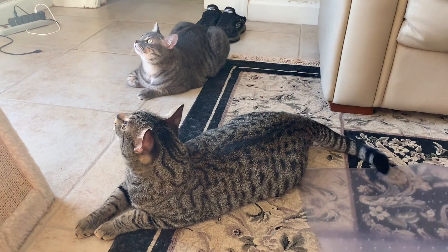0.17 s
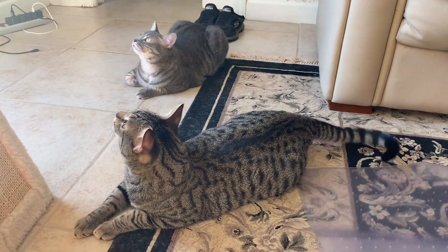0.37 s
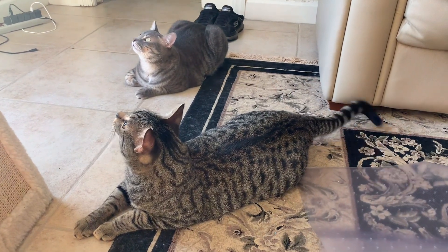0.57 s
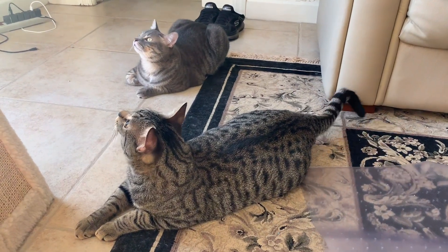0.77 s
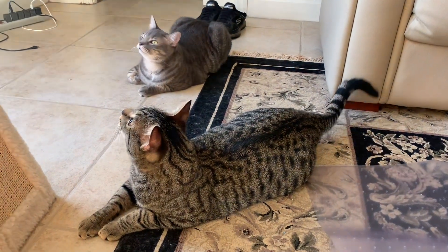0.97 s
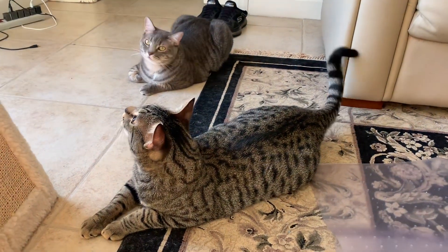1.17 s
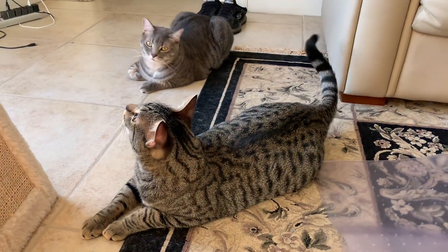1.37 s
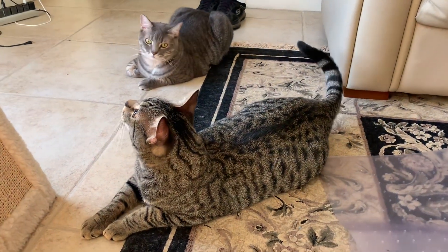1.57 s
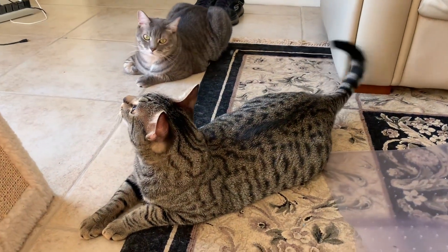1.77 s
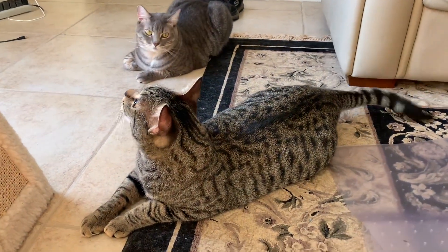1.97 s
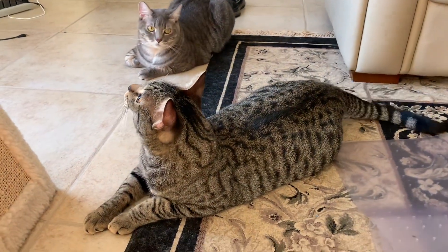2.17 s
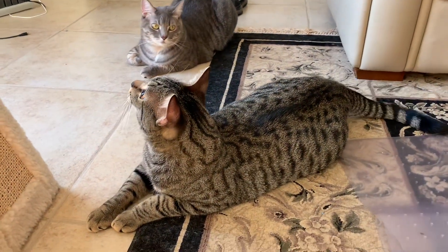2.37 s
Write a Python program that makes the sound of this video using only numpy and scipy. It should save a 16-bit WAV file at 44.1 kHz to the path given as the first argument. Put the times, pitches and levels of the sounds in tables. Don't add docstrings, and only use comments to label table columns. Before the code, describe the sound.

A cat gives two brief soft two-part chirps in a tiled living room over low ventilation rumble

```python
import sys
import numpy as np
from scipy import signal
from scipy.fft import rfft, irfft, next_fast_len
from scipy.io import wavfile
from scipy.ndimage import uniform_filter1d, map_coordinates

SR = 44100
rng = np.random.default_rng(int(sys.argv[2]) if len(sys.argv) > 2 else 0)


def level_to_linear(level):
    exponent = np.asarray(level, float) / 20
    return 10 ** exponent


def wav_out(sig):
    wavfile.write(sys.argv[1], SR, np.round(np.clip(np.atleast_2d(sig).T, -1, 1) * 32767).astype(np.int16))


N = 111132

# time in seconds, strength in dB.
FAN_STRENGTH = [(0.0, -47), (0.5, -48.5), (0.74, -49.5), (1.07, -47), (1.71, -48.5), (2.52, -45)]
# frequency in Hz, density in dB per Hz.
RUMBLE_SPECTRUM = [(28, -27.5), (40, -10.5), (62, -.5), (80, -5.5), (135, -5.5), (160, -13), (220, -13.5),
                   (500, -26.5)]
# frequency in Hz, width in Hz, height over the rumble in dB.
DUCT_RESONANCES = [(88.1, 13, 6.5), (412.5, 13.6, 9)]
# frequency in Hz, density in dB per Hz.
AIR_SPECTRUM = [(300, -17.5), (500, -3), (800, -2.5), (1100, -5), (1550, -2.5), (1900, -17), (2400, -22),
                (4000, -37)]
# frequency in Hz, left-right likeness from 0 to 1.
PORT_LIKENESS = [(60, 0.95), (300, .9), (800, 0.24), (1400, 0.58), (3000, 0.16), (7000, 0.14)]
# frequency in Hz, density in dB per Hz.
HISS_SPECTRUM = [(1500, -2), (2500, 2.5), (4000, 3.5), (7000, -1), (8500, 8.5), (10500, 1), (13000, 1.5),
                 (15500, -4)]
# frequency in Hz, phase in turns.
PORT_TURNS = [(0, 0), (1800, -.5), (3700, -1), (5300, -1.5), (6300, -2), (15700, 0)]
# frequency in Hz, phase taken back in turns.
NEAR_TURNS = [(0, 0), (950, .18), (1750, .44), (1950, .17), (2400, 0), (4300, 0), (5300, .22), (6300, 0)]
# time in seconds, pitch in Hz, level in dB, second harmonic in dB.
NOTES = [
    [(.123, 915, -62, -30), (.127, 925, -52, -30), (.138, 945, -50.5, -32), (.152, 964, -54, -28),
     (.194, 963, -54.5, -27), (.204, 963, -66, -20)],
    [(.224, 905, -60, -10), (.23, 888, -51, -5), (.242, 858, -52, 7), (.254, 866, -56, 4),
     (.262, 868, -59, -6), (.27, 868, -70, -8)],
    [(.991, 1012, -58, -22), (.995, 998, -48, -16), (1.004, 984, -48, -8), (1.02, 963, -49.5, -5),
     (1.03, 965, -56, -4), (1.062, 945, -60, -6), (1.072, 932, -70, -6)],
    [(1.095, 822, -64, -6), (1.102, 815, -54, -2), (1.112, 803, -53, -2), (1.122, 800, -59, -14),
     (1.134, 795, -69, -14)],
]
# third harmonic in dB, left-right difference in dB.
NOTE_MOUTHS = [(-38, 2.5), (-19, 2), (-38, 2), (-19, 1)]
# frequency in Hz, T60 in seconds.
ROOM_T60 = [(500, .4), (2000, .55), (3000, .5), (5000, .28), (10000, .2)]
# delay in seconds, level in dB.
WALLS = [(.0055, -4.5), (.0105, -10.5), (0.0145, -16), (0.0243, -14), (0.034, -16.5)]
# start in seconds, smack in dB, puff in dB, puff length in seconds,
# extra sag in dB per second.
PUFFS = [
    (.2046, -43, -63, .068, -55),
    (1.0535, -36, -54, .04, 35),
]
# frequency in Hz, width in Hz, level in dB.
PUFF_RESONANCES = [
    [(1740, 560, 2.5), (2550, 590, -2), (3420, 630, -10.5), (4350, 350, -7.5), (5070, 590, -5),
     (6060, 600, -17)],
    [(1520, 920, 13.5), (2050, 176, 25.5), (2600, 2050, 8.5), (4160, 200, -8), (4800, 1600, 4.5),
     (7100, 500, -7)],
]
# start in seconds, level in dB, left-right difference in dB.
TAPS = [
    (0.9184, -39, 3.6),
    (2.4363, -36.5, 12.6),
]
# frequency in Hz, level in dB, T60 in seconds.
TAP_MODES = [
    [(1220, -3.5, 0.027), (1470, 2.5, 0.015), (3020, -10, 0.015)],
    [(1070, -15, 0.025), (1337, -2, 0.022), (1990, -4.5, .014), (2560, -12, .008), (3020, -14, .012),
     (4250, -20.5, 0.0083)],
]
# start in seconds, level in dB, pitch in Hz.
TICKS = [(2.007, -29.5, 9740), (2.0087, -52, 9900), (2.437, -61, 9700), (2.4676, -48.5, 11230),
         (2.4676, -48, 12500), (2.4685, -52, 9800)]
# ratio to the pitch, level in dB, T60 in seconds.
TICK_MODES = [(.45, -19, 0.0022), (.62, -21, 0.0042), (.86, -12, 0.0065), (1.001, 6.5, .004),
              (1.079, 0, 0.0031), (1.24, -21, .003), (1.43, -21, 0.0038)]
# centre in seconds, length in seconds, level in dB.
BRUSHES = [
    (2.355, 0.12, -65.5),
    (2.485, 0.11, -63),
]
# frequency in Hz, density in dB per Hz.
RUG_SPECTRUM = [(450, -20), (650, -4), (780, -6.5), (950, -11), (1300, -36)]


def unit(x):
    return x / np.sqrt(np.mean(x ** 2) + 1e-20)


def along(points, hz):
    f, value = np.transpose(points)
    return np.interp(np.log(hz + 1), np.log(f + 1), value)


def wobble(rate_hz):
    knots = rng.standard_normal(int(N * rate_hz / SR) + 4)
    return map_coordinates(knots, [np.arange(N) * rate_hz / SR])


def filtered(x, response):
    m = next_fast_len(N + SR // 2)
    return irfft(rfft(x, m) * response(np.fft.rfftfreq(m, 1 / SR)), m)[..., :N]


def panned(x, left_over_right_db):
    return x * level_to_linear(np.array([[left_over_right_db / 2], [-left_over_right_db / 2]]))


def turned(x, turns):
    sides = np.array([[-1], [1]])
    return filtered(x, lambda hz: np.exp(1j * np.pi * np.interp(hz, *np.transpose(turns)) * sides))


def rush(gain, patchy_db):
    z = signal.stft(rng.standard_normal((2, N)), nperseg=512)[2]
    patches = uniform_filter1d(rng.standard_normal(z.shape[1:]), size=5, axis=0)
    patches = uniform_filter1d(patches, size=12, axis=1)
    pair = signal.istft(z * level_to_linear(patchy_db * unit(patches)), nperseg=512)[1][:, :N]

    def mid_side_gain(hz):
        angle = np.arccos(np.clip(along(PORT_LIKENESS, hz), -1, 1)) / 2
        return gain(hz) * [np.cos(angle), np.sin(angle)]

    mid, side = filtered(pair, mid_side_gain)
    return unit(np.array([mid + side, mid - side]))


def ventilation():
    s, db = np.transpose(FAN_STRENGTH)
    strength_db = np.interp(np.arange(N) / SR, s, db)

    def duct_gain(hz):
        peaks_db = sum(g / (1 + (2 * (hz - c) / w) ** 2) for c, w, g in DUCT_RESONANCES)
        return level_to_linear(along(RUMBLE_SPECTRUM, hz) + peaks_db - 90 * (hz > 520))

    def air_gain(hz):
        return level_to_linear(along(AIR_SPECTRUM, hz)) * (hz > 250) * (hz < 5000)

    rumble_db = 1 + strength_db + 0.37 * wobble(2.82)
    air_db = -61 + 0.7 * (strength_db - db.mean()) + 0.2 * wobble(3.11)
    rumble = level_to_linear(rumble_db) * rush(duct_gain, patchy_db=1.26)
    air = level_to_linear(air_db) * rush(air_gain, patchy_db=2.8)
    return rumble + panned(air, 1.8)


def voice():
    jitter, shimmer_db, edge_s = .003, .8, 0.0013
    t, out = np.arange(N) / SR, 0
    for rows, (third_db, pan_db) in zip(NOTES, NOTE_MOUTHS):
        s, hz, db, second_db = np.transpose(rows)
        pitch_hz = np.interp(t, s, hz) * (1 + jitter * wobble(147.8))
        phase = 2 * np.pi * np.cumsum(pitch_hz) / SR
        tone = np.sin(phase)
        tone = tone + level_to_linear(np.interp(t, s, second_db)) * np.sin(2 * phase)
        tone = tone + level_to_linear(third_db) * np.sin(3 * phase)
        edge = np.clip(np.minimum(t - s[0], s[-1] - t) / edge_s, 0, 1)
        level_db = np.interp(t, s, db) + shimmer_db * wobble(140)
        out = out + panned(np.sqrt(2) * tone * edge * level_to_linear(level_db), pan_db)
    return out


def room(x):
    wet_db = -8
    hz, t, z = signal.stft(rng.standard_normal((2, SR // 2)), SR, nperseg=256)
    decay = level_to_linear(-60 * t / along(ROOM_T60, hz)[:, None])
    tail = signal.istft(z * decay, SR, nperseg=256)[1]
    tail = np.pad(level_to_linear(wet_db) * tail / np.linalg.norm(tail[0]), ((0, 0), (300, 0)))
    for delay_s, db in WALLS:
        tail[[0, 1], round(delay_s * SR) + rng.integers(-6, 6, 2)] += level_to_linear(db)
    return signal.fftconvolve(x.mean(axis=0)[None], tail, axes=1)[:, :N]


def puffs():
    rise_s, sag_db_per_s, release_db_per_s = .003, 55, 255
    grainy_db, smack_t60_s = 4, .016
    mouth_top_hz, smack_top_hz = 7230, 3500
    out = 0
    for (s, smack_db, puff_db, length_s, extra_sag), resonances in zip(PUFFS, PUFF_RESONANCES):
        t = np.clip(np.arange(N) / SR - s, 0, None)

        def mouth(f):
            total = 0
            for k, (c, w, db) in enumerate(resonances):
                total = total + (-1) ** k * level_to_linear(db) * 1j * f * w / (c * c - f * f + 1j * f * w)
            return total / (1 + (f / mouth_top_hz) ** 20)

        def dull_mouth(f):
            return mouth(f) / (1 + 1j * f / smack_top_hz) ** 2

        air = unit(filtered(rng.standard_normal(N) * level_to_linear(grainy_db * wobble(300)), mouth))
        fade_db = (sag_db_per_s + extra_sag) * t + release_db_per_s * np.clip(t - length_s, 0, None)
        burst = rng.standard_normal(N) * (t > 0) * level_to_linear(-60 * t / smack_t60_s)
        smack = filtered(burst, dull_mouth)
        out = out + level_to_linear(smack_db) * smack / abs(smack).max()
        out = out + level_to_linear(puff_db - fade_db) * (1 - np.exp(-t / rise_s)) * air
    return panned(out, -.4)


def struck(s, hz, modes, rise_s):
    out, t = np.zeros(N + SR), np.arange(SR // 20) / SR
    ring = sum(level_to_linear(db - 60 * t / t60) * np.sin(2 * np.pi * hz * r * t) for r, db, t60 in modes)
    out[round(s * SR):][:len(t)] = ring * (1 - np.exp(-(t / rise_s) ** 2))
    return out[:N]


def taps():
    out = 0
    for (s, db, pan_db), modes in zip(TAPS, TAP_MODES):
        out = out + panned(level_to_linear(db) * struck(s, 0.98, modes, rise_s=0.0017), pan_db)
    return out


def ticks():
    return sum(level_to_linear(db) * struck(s, hz, TICK_MODES, rise_s=0.00047) for s, db, hz in TICKS)


def tail_brush():
    t = np.arange(N) / SR
    swell = sum(level_to_linear(db) * np.exp(-((t - s) / length_s) ** 2) for s, length_s, db in BRUSHES)
    return swell * rush(lambda hz: level_to_linear(along(RUG_SPECTRUM, hz)) * (hz > 400) * (hz < 1500), patchy_db=2.5)


def scene():
    fan, calls, air = ventilation(), voice(), puffs()
    knocks = taps() + ticks()
    voice_send_db, knock_send_db = -7, -4
    echo = room(level_to_linear(voice_send_db) * calls + air + level_to_linear(knock_send_db) * knocks)
    return turned(calls + air + knocks, NEAR_TURNS) + echo + fan + tail_brush()


def roll_off(x):
    return signal.sosfilt(signal.butter(12, 16980, fs=SR, output="sos"), x)


def record(dry):
    hiss_db, shared_treble_hz, leak_db, top_hz = -75.5, 7600, -19, 15750
    hiss = rush(lambda hz: level_to_linear(along(HISS_SPECTRUM, hz)) * (hz > 1000), patchy_db=2.35)
    x = dry + level_to_linear(hiss_db) * hiss
    mid = x.mean(axis=0)
    side = filtered(x[0] - mid, lambda hz: level_to_linear(leak_db / (1 + (shared_treble_hz / (hz + 1)) ** 16)))
    lagged = turned(np.array([mid + side, mid - side]), PORT_TURNS)
    return roll_off(filtered(lagged, lambda hz: hz < top_hz))


dry = scene()
out = record(dry)
wav_out(out)
```